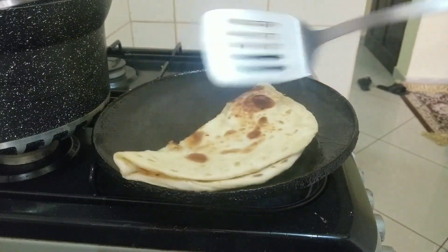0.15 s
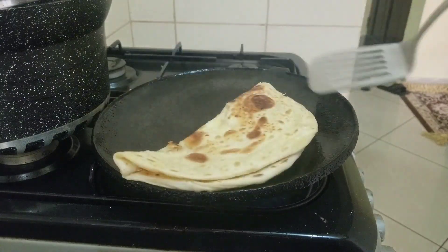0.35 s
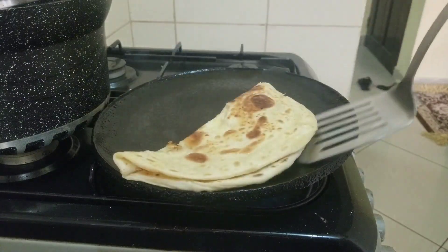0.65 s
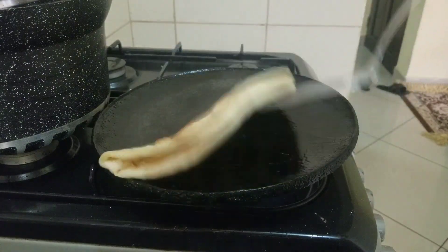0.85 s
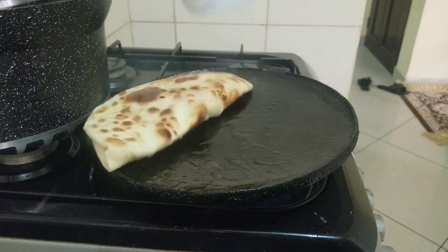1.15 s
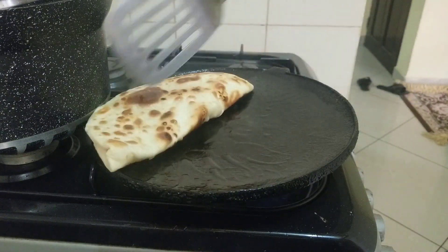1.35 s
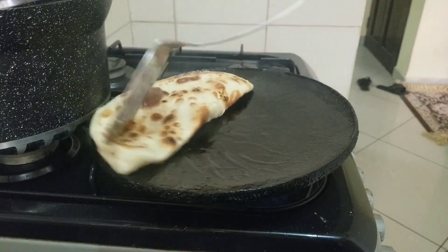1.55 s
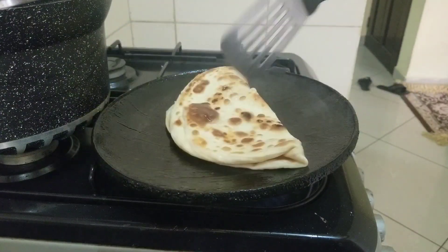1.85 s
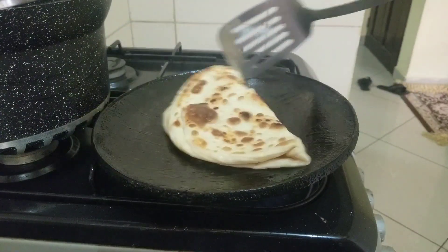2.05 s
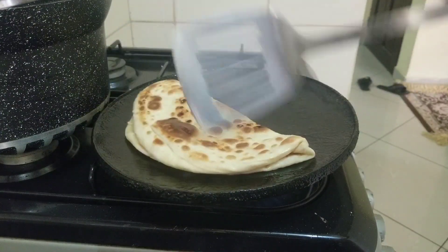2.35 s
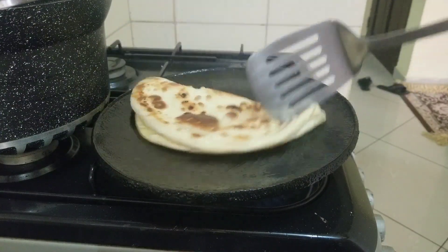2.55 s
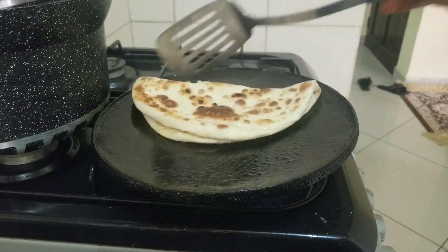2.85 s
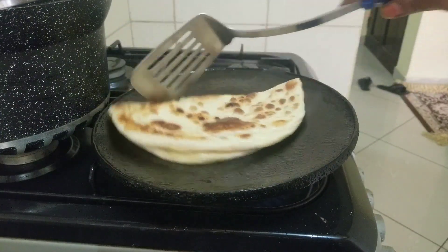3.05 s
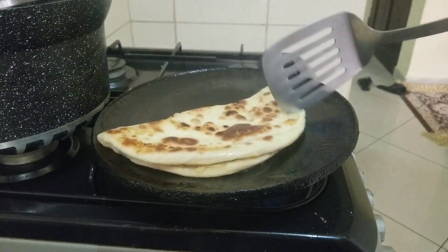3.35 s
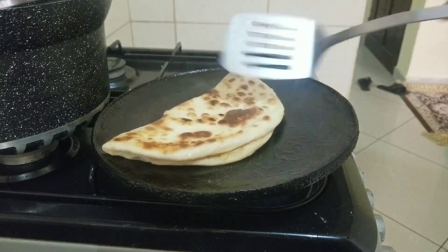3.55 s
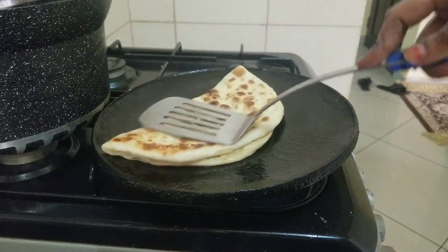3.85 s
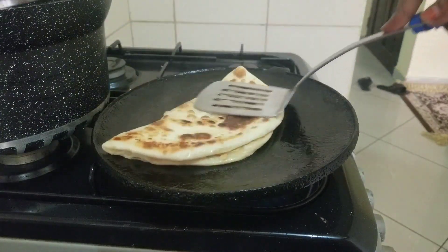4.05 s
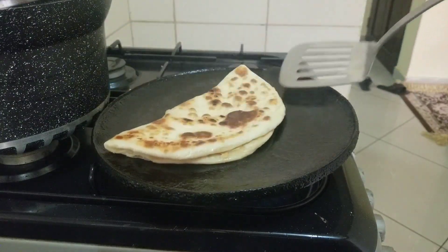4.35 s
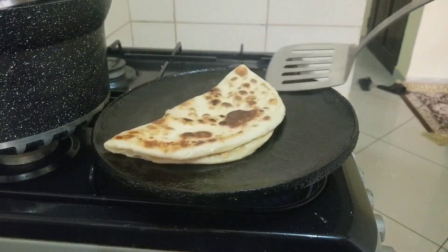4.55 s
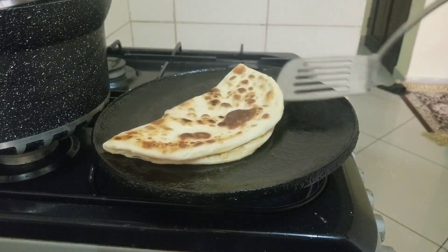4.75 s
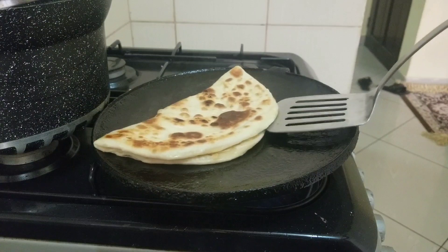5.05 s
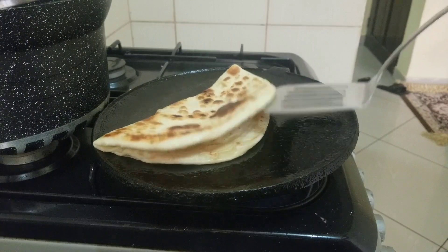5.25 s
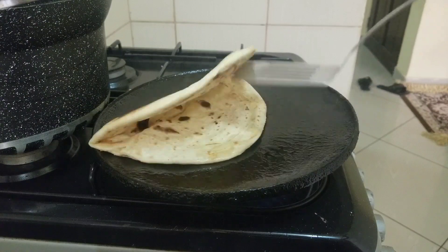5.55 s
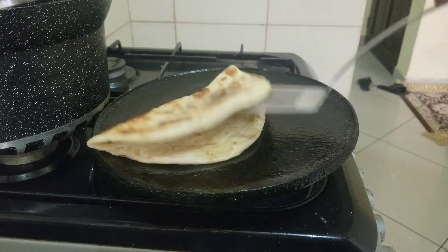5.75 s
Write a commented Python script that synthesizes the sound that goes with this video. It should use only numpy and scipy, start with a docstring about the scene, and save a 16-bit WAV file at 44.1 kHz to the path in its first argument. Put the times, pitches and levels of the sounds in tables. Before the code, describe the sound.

A metal spatula scrapes under flatbread on a hot griddle, with sharp ringing knocks, crackling spits and a low stove rumble in a kitchen.

```python
"""First a soft flop of bread and a light rub of the blade, then hard knocks of metal on a hot iron griddle.
Tiled kitchen, two close microphone ports: a slotted spatula scrapes under a folded flatbread and flips it.
Knocks are noise cracks, decaying blade modes and dense clang; flops and spits are short shaped noise.
Scrape and sizzle are grainy noise that swells with each stroke; one squeak judders by stick and slip.
Behind it all the gas stove rumbles: low noise and a few narrow resonances, with one passing swell."""
import sys
import numpy as np
from scipy import signal
from scipy.fft import rfft, irfft, next_fast_len
from scipy.io import wavfile
from scipy.ndimage import uniform_filter1d, map_coordinates

SR = 44100
rng = np.random.default_rng(int(sys.argv[2]) if len(sys.argv) > 2 else 0)


def int16_out(signal):
    """Quantize to a 16-bit WAV file."""
    q = np.round(np.clip(np.atleast_2d(signal).T, -1, 1) * 32767)
    wavfile.write(sys.argv[1], SR, q.astype(np.int16))


N = 259749
TIME, BINS = np.arange(N) / SR, np.fft.rfftfreq(N, 1 / SR)  # s, Hz


def gain_of(db):
    """Decibels to gain."""
    return 10 ** (np.asarray(db) / 20)


def evened(x):
    """Scales to rms 1."""
    return x / np.sqrt(np.mean(x ** 2) + 1e-20)


def noise(size):
    """Two unrelated channels of white noise."""
    return rng.standard_normal((2, size))


def read(points, hz):
    """Reads a table on a log-frequency axis."""
    f, value = np.transpose(points)
    return np.interp(np.log(hz + 1), np.log(f + 1), value)


def add(mix, s, sound):
    """Adds a stereo sound at time s."""
    part = mix[:, max(round(s * SR), 0):][:, :sound.shape[1]]
    part += sound[:, :part.shape[1]]


# likeness of the two close microphone ports: (frequency [Hz], left-right correlation [-1 to 1])
PORT_LIKENESS = [(100, 0.89), (250, 1), (600, 0.3), (1500, 0.19), (4000, 0.11), (12000, 0.061)]


def coloured(x, spectrum, tilt_db=0):
    """Gives two unrelated signals a spectrum and the likeness of two close microphone ports; rms 1."""
    size = next_fast_len(x.shape[1])
    hz = np.fft.rfftfreq(size, 1 / SR)
    a, b = rfft(x, size)
    same = np.clip(read(PORT_LIKENESS, hz), -1, 1)
    pair = np.array([same * b + np.sqrt(1 - same ** 2) * a, b])
    colour = gain_of(read(spectrum, hz) + tilt_db * np.log2(hz + 1))  # tilt in dB per octave
    return evened(irfft(pair * colour, size)[:, :x.shape[1]])


def waver(width_hz, size):
    """Slow complex noise of rms 1: the restless amplitude of a narrow resonance."""
    z = rng.standard_normal((size, 2)) @ [1, 1j]
    z = np.fft.ifft(np.fft.fft(z) / (1 + (2 * np.fft.fftfreq(size, 1 / SR) / width_hz) ** 2))
    return z / np.sqrt(np.mean(abs(z) ** 2))


def held_age(t, chatter):
    """Age of a ring that hardly falls at first, while the contact chatters."""
    return np.hypot(t, chatter) - chatter


# how long clang and kitchen echo last: (frequency [Hz], time to fall 60 dB [s])
CLANG_T60 = [(200, 0.71), (1000, 0.76), (3000, 0.47), (7000, 0.4), (15000, 0.39)]


def dying(x, chatter=0):
    """Lets each band die at its own speed, held up at first while the contact chatters."""
    hz, t, z = signal.stft(x, SR, nperseg=256)
    fall_db = -60 * held_age(t, chatter) / read(CLANG_T60, hz)[:, None]
    return signal.istft(z * gain_of(fall_db), SR, nperseg=256)[1][:, :x.shape[1]]


def kitchen(x, wet_db):
    """Adds the short diffuse echo of tiled walls."""
    tail = dying(noise(SR // 2))
    tail[:, :SR // 400] = 0  # the first 2.5 ms stay free of echo
    tail /= np.linalg.norm(tail[0])
    return x + gain_of(wet_db) * signal.oaconvolve(x, tail, axes=1)[:, :N]


# blade on iron: (time [s], level [dB], part of the blade that lands, chatter before the ring falls [s],
# first crack against clang [dB], ring gain [dB])
KNOCKS = [(0.441, -33.5, "edge", .002, 7.5, -4), (2.0059, -18, "corner", 0.038, 1, -2),
          (2.8797, -18.5, "edge", 0.0011, 4, 1.5), (4.5124, -43, "flat", 0.008, -14, 2.5),
          (5.3297, -28, "flat", 0.0033, 2.5, 0)]
# the parts of the blade, in the column order of the next two tables
PARTS = ["corner", "edge", "flat"]
# spatula modes: (frequency [Hz], time to fall 60 dB [s], level on corner [dB], on edge [dB], flat [dB])
BLADE = [(1190, .46, -19, -26, -40), (1320, .5, -27, -16, -36), (1610, .45, -23, -18, -28),
         (1770, .35, -13, -21, -23), (2058, .31, -15, -3, -16), (2250, .4, 4, -13, -19),
         (2485, .4, -17, -14, -22), (2602, .31, -9, -13, -28), (2997, .3, -2, -9, -24),
         (3150, .42, -10, -12, -24), (3218, .28, -4, -7, -16), (3480, .39, -16.5, -15, -22),
         (3915, .3, -15, -15, -18), (4106, .38, -2, -11, -17), (4291, .32, -6, -1, -20),
         (4490, .3, -11, -8, -23), (4570, .3, -12, -12, -25), (4769, .41, -14, -15, -27),
         (5263, .35, -5, -13, -5.5), (5440, .3, -14, -13, -9), (5632, .29, -5, -21, -26),
         (6040, .35, -16, -17, -20), (6534, .35, -14, -20, -8), (6584, .48, -15, -15, -15),
         (6709, .23, -3, -16, -9), (7358, .2, -24, -6, -22), (7730, .18, -11, -26, -30),
         (7930, .24, -12, -14, -22), (8125, .26, -11, -14, -14), (9560, .27, -18, -24, -25),
         (10115, .29, -12.5, -34, -23), (10450, .28, -21, -34, -22), (12000, .16, -19, -16, -12),
         (12600, .16, -19, -22, -15)]
# dense clang of griddle, grate and kitchen:
# (frequency [Hz], density on corner [dB per Hz], on edge [dB per Hz], flat [dB per Hz])
CLANG = [(60, -29, -20, -7), (300, -14.5, -11, 0), (920, -9, -4.5, -4.5), (1490, -11, -5.5, 1),
         (2340, 0, 1, 1.5), (4500, 0.5, 5.5, 3), (5770, -2.5, 1.5, 0), (6490, -0.5, 6.5, 13),
         (8500, -9, -4.5, -10), (10600, -11, -4, 1), (12500, -11.5, -4.5, 0), (16500, -15, -12.5, 2.5)]
CRACK_TILT_DB = .5  # the first crack is this much brighter per octave than the clang


def struck_blade(t, age, k, fuzz=0.52, fuzz_hz=35, port_spread=1.68):
    """The blade's modes ring and die, each reaching the two ports out of step (radians)."""
    ring = np.zeros((2, len(t)))
    port_phase = port_spread * (-1) ** np.arange(len(BLADE))
    for (hz, t60, *mode_db), phase in zip(BLADE, port_phase):
        tone = np.exp(2j * np.pi * (hz * t + rng.random())) * gain_of(mode_db[k] - 60 * age / t60)
        blur = fuzz * waver(fuzz_hz, len(t))  # reflections make the ring flutter
        ring += np.sqrt(2) * np.real([tone * (np.exp(1j * phase) + blur[::-1]), tone * (1 + blur)])
    return ring


def knocks(crack_s=0.01, rise_s=0.000217):
    """Each blow cracks, rings the blade's modes and sets off the dense clang of the iron."""
    out, t = np.zeros((2, N)), np.arange(SR * 4 // 5) / SR
    for s, db, part, chatter, crack_db, ring_db in KNOCKS:
        k = PARTS.index(part)
        spectrum = [(row[0], row[1:][k]) for row in CLANG]
        clang = dying(coloured(noise(len(t)), spectrum), chatter)
        crack = coloured(noise(len(t)), spectrum, CRACK_TILT_DB) * np.exp(-t / crack_s)
        ring = struck_blade(t, held_age(t, chatter), k)
        blow = clang + gain_of(crack_db) * crack + gain_of(ring_db) * ring
        add(out, s, gain_of(db) * blow * (1 - np.exp(-t / rise_s)))
    return out


# blows that set the heavy griddle humming on its grate: (time [s], level [dB])
BOOMS = [(0.0, -50), (2.8797, -41.5), (5.3294, -47)]
# lowest modes of the iron: (frequency [Hz], time to fall 60 dB [s], level against the blow [dB])
GRIDDLE = [(289, 1, -1), (365, 0.83, -6), (686, 0.42, -2.5)]


def griddle(rise_s=0.045):
    """The iron's lowest modes build up after a blow and outlast the clang."""
    out, t = np.zeros((2, N)), np.arange(SR) / SR
    for s, db in BOOMS:
        hum = np.zeros(len(t))
        for hz, t60, mode_db in GRIDDLE:
            fall = gain_of(db + mode_db - 60 * t / t60)
            hum += fall * np.sin(2 * np.pi * (hz * t + rng.random()))
        add(out, s, np.tile(np.sqrt(2) * hum * (1 - np.exp(-t / rise_s)), (2, 1)))
    return out


# strokes of the blade and slides of the bread: (time of full pressure [s], rise [s], fall [s],
# rubbing level [dB], sizzle level [dB])
STROKES = [(.02, 0.29, .22, -44.5, -58), (.47, 0.032, 1, -37, -64), (0.599, 0.053, 0.28, -32, -26),
           (.70, 0.084, 0.17, -36, -26.5), (.9, 0.1, 0.3, -49, -37), (1.079, .03, 1, -79, -48.5),
           (1.624, 0.14, 0.25, -38.5, -42), (1.89, 0.13, 0.23, -56, -42.5), (2.5, 0.31, 0.43, -46, -47.5),
           (3.42, 0.89, 0.95, -53, -68), (3.766, 0.02, 0.063, -44, -39.5), (3.97, 0.43, 0.35, -46, -44),
           (4.23, 0.56, 0.23, -48, -49), (4.7, 1, 0.55, -53, -62), (4.968, .06, 0.18, -54, -51.5),
           (5.86, 0.26, .3, -55.5, -75)]
STROKE_DEPTH_DB = 20  # a stroke climbs this much in its rise time and loses it in its fall time
REST_RUB_DB, REST_SIZZLE_DB = -65, -57  # what goes on while the bread lies still


def effort():
    """Rubbing and sizzle gains over time: every stroke swells and dies away above the resting level."""
    power = gain_of([[REST_RUB_DB], [REST_SIZZLE_DB]]) ** 2 * np.ones(N)
    for s, rise, fall, rub_db, sizzle_db in STROKES:
        away = np.minimum(np.maximum((s - TIME) / rise, (TIME - s) / fall), 10)
        power += (gain_of([[rub_db], [sizzle_db]]) * gain_of(-STROKE_DEPTH_DB * away)) ** 2
    return np.sqrt(power)


# modes of the blade while it is pressed down: (frequency [Hz], width [Hz], level [dB])
PRESSED = [(1442, 70, -2), (1886, 140, 0), (2463, 190, -1), (3250, 110, 5), (3600, 210, -0.5),
           (4090, 230, 4), (5380, 154, 4.5)]
FLEX_SHARE, FLEX_HZ = .025, 9  # the bending blade: scale of the pitch wander (share), its bandwidth


def blade_ring(x):
    """Friction noise through the broad modes of the pressed blade, which wander as it bends."""
    response = sum(gain_of(db) / (1 + (2 * (BINS - hz) / width) ** 2) ** 2 for hz, width, db in PRESSED)
    bend = FLEX_SHARE * waver(FLEX_HZ, next_fast_len(N))[:N].real
    place = np.cumsum(1 + bend - bend.mean())  # uneven reading position bends the pitch
    ports = irfft(rfft(x) * response, N)
    return evened(np.array([map_coordinates(port, [place], order=3, mode="nearest") for port in ports]))


def grains(per_s, spread_db, grain_s, wash):
    """Random bursts of very unequal size over a wash of countless smaller ones."""
    size = gain_of(spread_db * np.minimum(rng.exponential(1, N), 4)) * (rng.random(N) < per_s / SR)
    power = signal.lfilter([1], [1, -np.exp(-1 / (grain_s * SR))], size ** 2)
    return np.sqrt(power / power.mean() + wash ** 2) * noise(N)


# colour of blade and crust on iron: (frequency [Hz], density [dB per Hz])
RUB = [(200, -22), (600, -10), (1200, -5), (2200, -3.5), (4000, -0.5), (6300, 1.5), (8500, -9), (12000, -7),
       (16000, -13)]
# colour of the fizzing oil: (frequency [Hz], density [dB per Hz])
SIZZLE = [(1000, -31), (4000, -15.5), (7000, -2), (8500, -14.5), (10000, -3), (13000, 1), (15500, 0.5),
          (16500, -20.5)]
# blade ring relative to a firm rub; it grows faster than the rubbing does
SCRAPE_RING_DB, RING_GROWTH, FIRM_RUB_DB = -3, .7, -36


def frying(rubbing, sizzling):
    """Blade and crust rub over the iron; oil fizzes where the bread is disturbed."""
    rub = coloured(grains(per_s=580, spread_db=6.0, grain_s=0.0011, wash=3.3), RUB)
    sizzle = coloured(grains(per_s=260, spread_db=5.5, grain_s=.0003, wash=1.4), SIZZLE)
    firmness = (rubbing / gain_of(FIRM_RUB_DB)) ** RING_GROWTH
    ring = gain_of(SCRAPE_RING_DB) * blade_ring(noise(N)) * firmness
    return (rub + ring) * rubbing + sizzle * sizzling


# the blade edge judders as it slides under the bread: (time [s], slip rate [Hz], level [dB])
JUDDER = [(0.55, 980, -69), (0.6, 942, -63), (.645, 927, -51), (.68, 867, -42.5), (.715, 825, -52),
          (.75, 832, -51), (0.798, 786, -63)]


def judder(width_hz=70, rolloff_db=-6):
    """Uneven stick and slip of the edge: a rough squeak that falls as the blade slows."""
    s, hz, db = np.transpose(JUDDER)
    t = np.arange(round(s[0] * SR), round(s[-1] * SR)) / SR
    turns = np.cumsum(np.interp(t, s, hz)) / SR
    squeak = np.zeros(len(t))
    for k in range(1, 5):  # the slip rate and its overtones
        partial = waver(width_hz, len(t)) * np.exp(2j * np.pi * k * turns)
        squeak += gain_of(rolloff_db * k) * partial.real
    out = np.zeros((2, N))
    add(out, s[0], np.tile(evened(squeak) * gain_of(np.interp(t, s, db)), (2, 1)))
    return out


# soft blows of bread and blade on bread:
# (time [s], level [dB], decay time [s], brightness [dB per octave])
FLOPS = [(.002, -44.5, 0.065, 1), (0.257, -42.5, 0.0056, 5.5), (0.89, -46.5, 0.056, 1),
         (1.071, -28, 0.0062, 3), (1.072, -43.5, 0.055, -3), (1.108, -33.5, 0.013, 1),
         (3.756, -41, 0.041, 0.5), (3.975, -44, 0.036, 0.5), (4.094, -42.5, 0.044, 2),
         (4.229, -41.5, 0.017, 2.5), (4.513, -43.5, 0.056, 2.5), (5.642, -35.5, 0.01, 4.5),
         (5.6517, -26, 0.003, 2)]
# colour of the slap before its brightness: (frequency [Hz], density [dB per Hz])
FLOP = [(50, -30), (150, 7.5), (450, 8.5), (900, 2), (2100, 3), (4000, -3.5), (7000, -12), (16000, -41)]


def flops(rise_s=0.00067):
    """Soft dough gives a damp slap with no ring."""
    out, t = np.zeros((2, N)), np.arange(SR // 3) / SR
    for s, db, length, bright_db in FLOPS:
        slap = coloured(noise(len(t)), FLOP, bright_db)
        add(out, s, gain_of(db) * slap * np.exp(-t / length) * (1 - np.exp(-t / rise_s)))
    return kitchen(out, wet_db=-4.5)


# oil spits and crust snaps at set times: (time [s], level [dB])
SPITS = [(0.066, -29), (0.5915, -9), (.663, -10.5), (0.6848, -11), (0.8995, -24), (1.072, -17.5),
         (1.3445, -29.5), (1.827, -27), (1.8879, -15.5), (1.990, -20), (2.4604, -31), (2.4772, -20.5),
         (2.5032, -20.5), (2.5366, -23.5), (2.621, -26)]
# colour of a spit: (frequency [Hz], density [dB per Hz])
SPIT = [(500, -47), (2500, -31.5), (5000, 0.5), (8000, -5), (12000, -5), (16000, 0)]
# further spits come at random and grow with the sizzle: rate, level above the sizzle, scatter either way
SPITS_PER_S, SPIT_OVER_SIZZLE_DB, SPIT_SCATTER_DB = 16, 14, 3
RANDOM_SPIT_MAX_DB = -19  # no random spit is set above this level


def spits(sizzling, burst_s=0.00038, echo_s=0.0033, echo_db=-13):
    """Tiny steam bursts, each followed by its splash off the nearby pot and hob."""
    out, t = np.zeros((2, N)), np.arange(SR // 40) / SR
    splash = gain_of(echo_db) * np.exp(-abs(t - echo_s) / 0.0054)
    shape = np.exp(-t / burst_s) + splash
    at = np.flatnonzero(rng.random(N) < SPITS_PER_S / SR)
    scatter_db = SPIT_SCATTER_DB * rng.uniform(-1, 1, len(at))
    random_db = 20 * np.log10(sizzling[at]) + SPIT_OVER_SIZZLE_DB + scatter_db
    random_db = np.minimum(random_db, RANDOM_SPIT_MAX_DB)
    for s, db in list(SPITS) + list(zip(TIME[at], random_db)):
        add(out, s, gain_of(db) * shape * coloured(noise(len(t)), SPIT))
    return kitchen(out, wet_db=-3.5)


def shaded(x, left):
    """Gives the left port its own colour."""
    return np.array([irfft(rfft(x[0]) * gain_of(read(left, BINS)), N), x[1]])


# colour of the burner rumble: (frequency [Hz], density [dB per Hz])
STOVE = [(20, -22), (35, -5.5), (55, -2.5), (80, 1.5), (115, -5), (200, -7), (350, -4), (550, -10),
         (1000, -15.5), (2500, -18.5), (8000, -26)]
STOVE_DB = -50  # burner level before the left port is shaded
# low resonances of stove and kitchen: (frequency [Hz], width [Hz], level [dB])
DRONES = [(56.3, 12, -68), (114.5, 16, -56.5), (164, 6.6, -63.5), (293, 10, -67.5), (359.6, 8, -63.5)]
# colour of the low rumble that swells once and fades: (frequency [Hz], density [dB per Hz])
SWELL = [(100, -43), (152, 8), (185, -21), (225, -3.5), (340, -0.5), (500, -11), (850, -11.5),
         (1500, -24.5)]
SWELL_S, SWELL_LENGTH_S, SWELL_DB = 3.306, 1, -44  # time of its crest, whole length, crest level
# the burner lies to the right: (frequency [Hz], left port level [dB])
STOVE_LEFT = [(180, 0), (380, -6), (700, -8), (1300, -3.5), (2400, -12), (8000, -0.5)]


def stove():
    """Steady burner rumble with a few low resonances and one passing swell."""
    low = np.zeros(N)
    for hz, width, db in DRONES:
        drone = waver(width, next_fast_len(N))[:N] * np.exp(2j * np.pi * hz * TIME)
        low += gain_of(db) * evened(drone.real)
    arch = np.cos(np.pi * np.clip((TIME - SWELL_S) / SWELL_LENGTH_S, -.5, .5)) ** 2
    swell = gain_of(SWELL_DB) * arch * coloured(noise(N), SWELL)
    burner = gain_of(STOVE_DB) * coloured(noise(N), STOVE)
    return shaded(low + swell + burner, STOVE_LEFT)


def scene():
    """Everything on and around the griddle."""
    rubbing, sizzling = effort()
    blade = knocks() + griddle() + frying(rubbing, sizzling) + judder()
    return blade + flops() + spits(sizzling) + stove()


# the recorder's gain control: threshold, share of the excess taken off, attack, recovery
DUCK_ABOVE_DB, DUCK_SHARE, DUCK_ATTACK_S, RECOVER_DB_PER_S = -27, 0.32, 0.17, 1.86


def gain_control(x):
    """Turns everything down after a loud clang and creeps back up."""
    power = abs(uniform_filter1d((x ** 2).mean(0), size=SR // 100))  # averaged over 10 ms
    level_db = 10 * np.log10(power + 1e-12)
    wanted_db = DUCK_SHARE * np.maximum(level_db - DUCK_ABOVE_DB, 0)
    creep = RECOVER_DB_PER_S * TIME
    held_db = np.maximum.accumulate(wanted_db + creep) - creep  # drops at the recovery rate
    keep = np.exp(-1 / (DUCK_ATTACK_S * SR))
    return x * gain_of(-signal.lfilter([1 - keep], [1, -keep], held_db))


# colour of the left microphone port: (frequency [Hz], left port level [dB])
LEFT = [(60, -4), (200, -5), (380, -8), (700, -4), (1300, -7.5), (2250, -7), (3200, -9), (4200, -4.5),
        (5600, -9.5), (7100, -8), (8200, -9), (9300, 3.5), (13000, -2.5), (16000, -6)]
EDGE_HZ = 16000  # upper band limit


def record(dry):
    """The left port is shaded; gain control ducks after the clangs; peaks clip; then the band limit."""
    low_pass = signal.firwin(255, EDGE_HZ, window=("kaiser", 8), fs=SR)
    clipped = np.clip(gain_control(shaded(dry, LEFT)), -1, 1)
    return signal.oaconvolve(clipped, low_pass[None], "same", axes=1)


dry = scene()
out = record(dry)
int16_out(out)
```